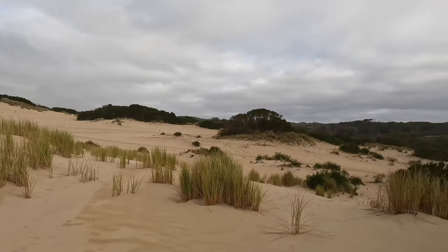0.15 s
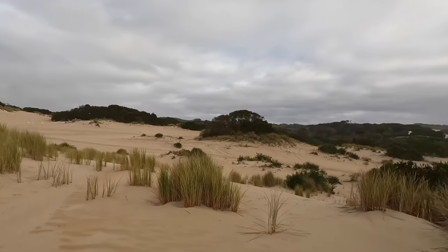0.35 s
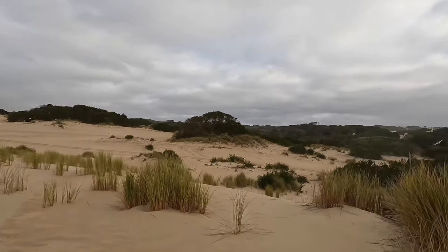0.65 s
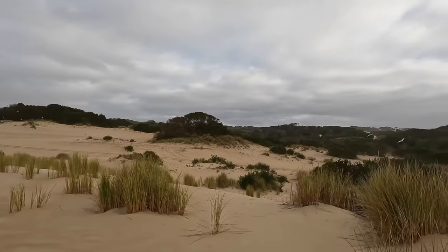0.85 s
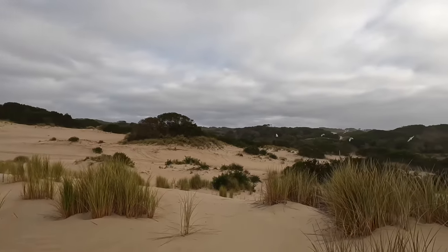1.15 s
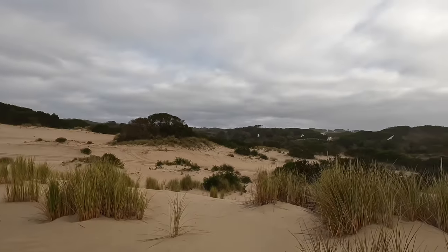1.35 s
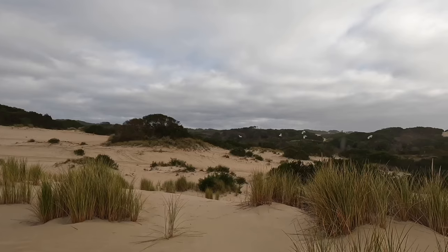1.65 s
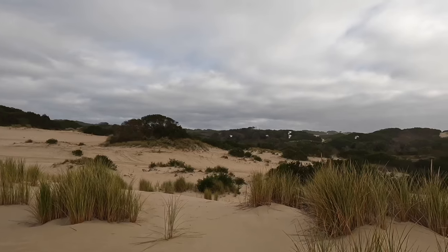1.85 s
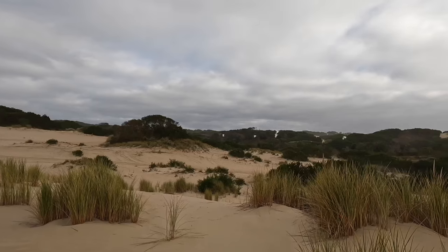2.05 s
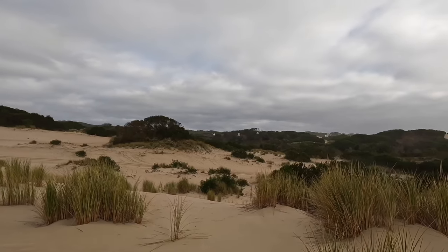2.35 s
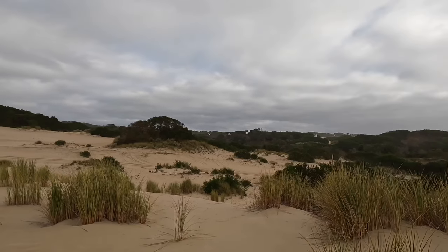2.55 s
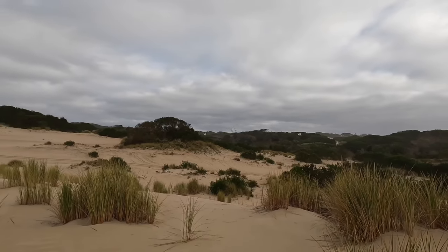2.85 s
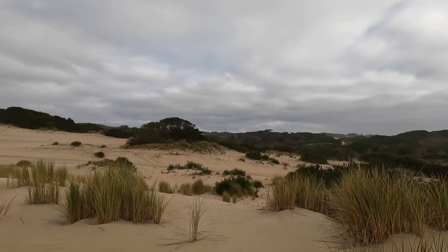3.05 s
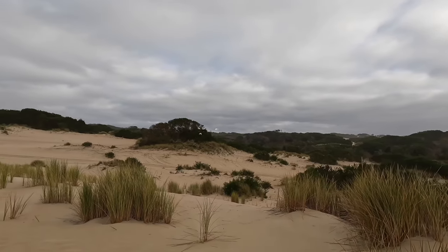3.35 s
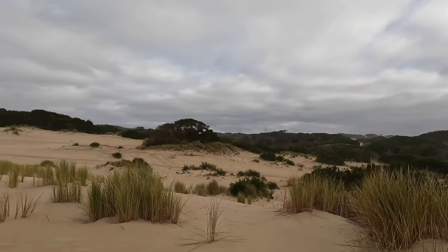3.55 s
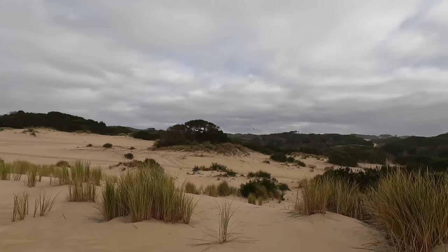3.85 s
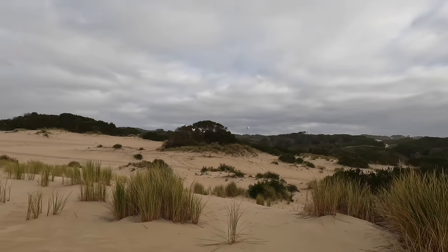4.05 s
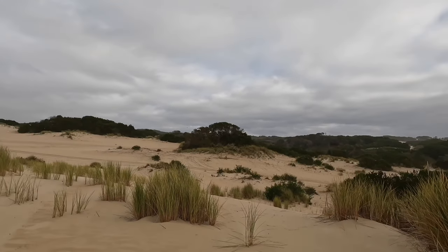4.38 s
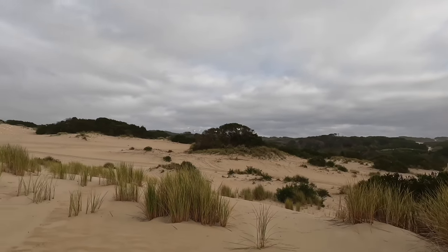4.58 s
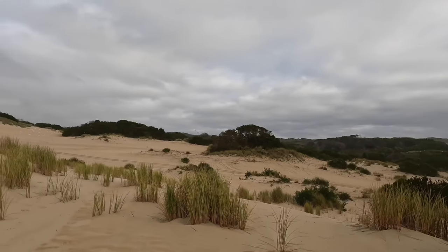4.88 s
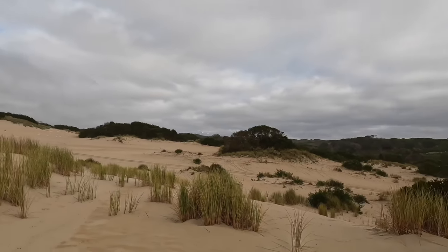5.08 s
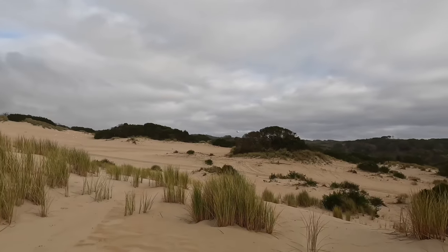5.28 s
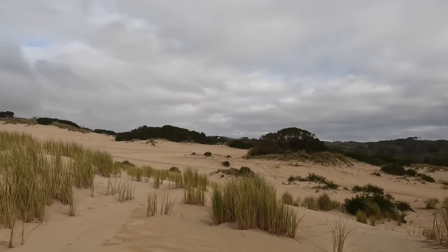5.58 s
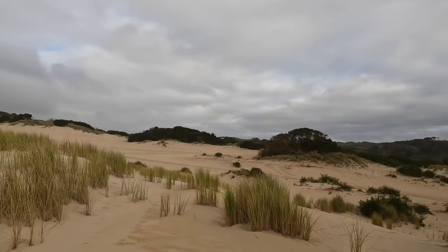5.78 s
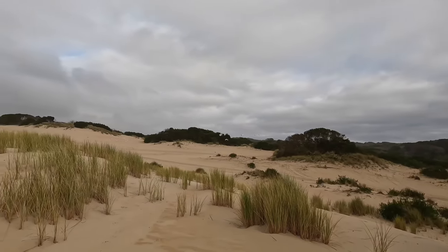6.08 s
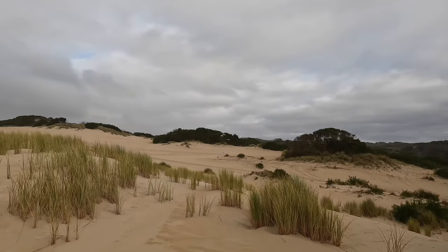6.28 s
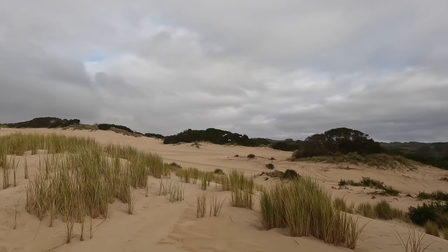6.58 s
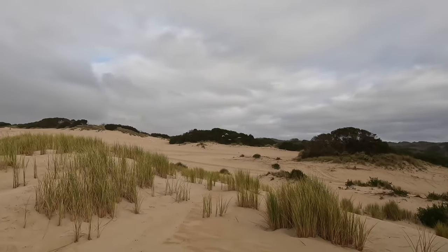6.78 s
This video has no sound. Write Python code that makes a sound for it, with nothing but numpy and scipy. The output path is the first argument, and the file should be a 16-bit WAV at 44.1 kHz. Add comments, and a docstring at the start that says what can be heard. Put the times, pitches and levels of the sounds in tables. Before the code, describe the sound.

Close cockatoos give loud, rough screeches while distant ones answer outdoors, with soft wind gusts and a low surf roar underneath.

```python
"""Cockatoos screech over coastal dunes: three close to the microphone, others far off in the scrub.
Each screech is a chaotic train of syrinx pulses near 950 Hz ringing the throat; at its end the voice
breaks and sinks about an octave. The calls arrive direct, off the sand and as a faint dune echo.
Wind rumbles on the microphone's two ports, grass rustles and distant surf lies underneath."""
import sys
import numpy as np
from scipy import signal
from scipy.fft import rfft, irfft, next_fast_len
from scipy.io import wavfile
from scipy.ndimage import uniform_filter1d

SR = 44100
rng = np.random.default_rng(int(sys.argv[2]) if len(sys.argv) > 2 else 0)


def file_out(sig):
    """Save sig as 16-bit WAV at sys.argv[1]."""
    # one column per channel
    cols = np.atleast_2d(sig).T
    # limit, then scale
    lim = np.clip(cols, -1, 1)
    pcm = np.round(lim * 32767).astype(np.int16)
    wavfile.write(sys.argv[1], SR, pcm)


N = 305552
TIME = np.arange(N) / SR

# One screech a row: caller, start_s, break_s, end_s, swell_s, level_db, crescendo_db, push_s, push_db,
# treble_share_db, pitch_hz, glide_hz_per_s, roughness (0-1), clearing (0-1, before the break),
# left_minus_right_db, first_lag_s, last_lag_s, bounce_strength (0-1; the last three: bounce off the sand)
# The "far" row at 3.3 s is only a very faint screech-like trace on the left.
SCREECHES = [ ("shrill", -.45, -0.031, 0.027, .06, -33, -4.5, -.2, 5, -7.5, 1000, 0, .6, .4, 1, 0.00256, .003, 1),
             ("far", .3, .868, .912, 0.053, -45.5, -1.6, 0.49, 2.8, -6.5, 890, 190, .8, 0.36, 5, .00243, 0.002074, 0.58),
             ("far", 1.0, 1.3, 1.33, .04, -71, -2, 1.08, 4.1, -14, 1200, -31, 0.98, 0.093, 17, 0.00082, 0.00101, .8),
             ("shrill", 1.319, 1.752, 1.79, 0.04, -29.4, -1.2, 1.442, 3, -3.5, 1035, 130, .8, 0.091, 0.83, .0064, .0062, 0.27),
             ("far", 1.76, 2.1, 2.14, 0.042, -52, 4, 1.99, 0.89, -8, 888, 102, 1, 0.308, 5.9, 0.0009, 0.00052, .05),
             ("shrill", 2.065, 2.529, 2.57, 0.042, -30.5, 1.7, 2.3, 2.25, -4.5, 990, -41, .76, 0.736, 1, 0.00232, 0.00223, 0.086),
             ("far", 2.76, 3.29, 3.34, 0.048, -52.5, 2.2, 2.97, 0.67, -8.5, 870, 75, .85, .3, 6.5, 0.004, .00246, .07),
             ("far", 3.3, 3.45, 3.56, .03, -67.5, -1, 3.4, 1.7, -6, 903, 150, .85, .2, 19.7, 0.0008, .00088, 0.55),
             ("far", 3.59, 4.112, 4.16, 0.067, -52, 3, 3.85, 1.2, -10.5, 893, 110, .87, .3, 4.5, 0.00224, 0.00217, 0.2),
             ("far", 4.27, 4.455, 4.49, 0.033, -64, 0.81, 4.38, 2, -22, 850, 150, 1, .1, 5.3, 0.0011, .00096, .1),
             ("hoarse", 4.562, 5.114, 5.17, 0.0546, -34.5, 1.5, 4.78, 2.9, -4, 990, -40, .7, .3, -.6, .0044, 0.0054, 0.22),
             ("gruff", 4.89, 5.364, 5.428, 0.044, -32.5, -1.1, 5.04, 2.8, -3.5, 900, 27.7, .76, 0.18, -.8, 0.00228, 0.00235, 0.1),
             ("hoarse", 5.42, 5.941, 5.976, 0.044, -34.6, 0, 5.55, 2.3, -3, 918, -100, 0.624, .75, -1.1, 0.0048, .0046, 0.22),
             ("hoarse", 6.296, 6.716, 6.772, 0.035, -34.5, -.5, 6.61, 1, -4, 935, -29.5, .6, .55, -1.2, 0.003, 0.00197, 0.11)]
# Throat and open beak as heard through the air at the microphone: frequency_hz, gain_db
SHRILL_THROAT = [(300, -27), (620, -23), (800, -15), (1080, -8), (1500, -11.5), (2150, 3.5), (2420, -2.5),
                 (3000, -3.5), (3950, -4.5), (4500, -8), (5500, -14), (7800, -23.5), (9300, -35),
                 (13500, -47)]
HOARSE_THROAT = [(300, -24.5), (620, -20), (880, -8.5), (1150, -6), (1500, -5.5), (2130, 5.5), (2450, -6),
                 (2850, 1.5), (3850, -1), (4450, -7.5), (5500, -12), (7600, -26), (9000, -43.5),
                 (13500, -47)]
GRUFF_THROAT = [(300, -55), (560, -4.5), (880, -7.5), (1150, -3.5), (1500, -2), (1950, 5), (2450, 2.5),
                (2850, 3.5), (3800, 4.5), (4450, -6.5), (5500, -7), (7600, -20.5), (9000, -40),
                (13500, -42.5)]
FAR_THROAT = [(300, -33.5), (700, -15), (900, -14), (1120, -9), (1500, -4), (1900, 0), (2350, 0.5),
              (3100, -6), (3600, -3), (4200, -12.5), (5200, -14.5), (6300, -28.5), (9000, -45),
              (13500, -69)]
# Upper resonances of the screech that swell and sink at random: centre_hz, width_hz
WAVERING_MODES = [(2800, 300), (3250, 350), (3750, 400), (4800, 500), (5600, 600)]
# Phase between the ports for birds ahead, to the right and far off: frequency_hz, left_lead_rad
AHEAD_PHASE = [(500, 0.21), (1000, -0.064), (1640, -0.55), (2240, -0.97), (2760, -0.86), (3050, 0.38),
               (4200, -0.36), (6400, -0.67), (8500, -0.64)]
RIGHT_PHASE = [(500, -0.47), (1000, -0.28), (1900, -0.92), (2330, -1.4), (2760, 0.054), (4300, -1.1),
               (6200, -0.89), (8200, -1.3)]
FAR_PHASE = [(690, .1), (1290, .2), (2580, -.2), (6200, 0)]
# Gusts at the microphone: peak_s, length_s, buffet_db, thud_db, rush_db
GUSTS = [(0.124, 0.12, -46.5, -55, -82), (0.532, 0.28, -41, -56, -61.5), (0.758, 0.16, -37, -52.5, -58.5),
         (1.156, 0.4, -47.5, -56.5, -60), (2.898, 0.12, -52, -72, -80), (3.267, .32, -54, -66, -56.5),
         (3.54, 0.19, -45, -61, -62), (4.015, 0.42, -44.5, -58, -64.5), (4.5, 0.38, -52, -65, -75.5),
         (4.985, 0.22, -60, -72, -61.5), (5.588, 0.15, -47.5, -52.5, -66.5), (5.883, 0.088, -50, -51, -61),
         (6.22, 0.44, -45.5, -50, -67), (6.466, 0.23, -56, -52, -56.5), (6.79, 0.36, -59, -61.5, -59)]
# The breeze between gusts: buffet_db, thud_db, rush_db
BREEZE = (-52.5, -67, -73)
# Brushes and flicks of grass: peak_s, length_s, level_db
GRASS_BRUSHES = [(0.75, 0.14, -56), (1.183, 0.34, -66), (1.29, 0.0053, -58), (2.645, 0.21, -64),
                 (3.205, .2, -68), (3.423, 0.25, -66.5)]
# Spectra of buffeted ports, thudding eddies, air rushing over sand, grass and surf: frequency_hz, gain_db
BUFFET_COLOUR = [(12, 4), (20, 13), (42, 8.5), (65, -3), (110, -19), (250, -55), (700, -100)]
THUD_COLOUR = [(40, -20), (70, 0), (110, -4.5), (170, -11.5), (300, -27), (800, -100)]
RUSH_COLOUR = [(120, -18), (250, 2), (400, -6), (520, -5.5), (750, -14), (1500, -14), (4000, -52),
               (10000, -70)]
GRASS_COLOUR = [(300, -28), (800, -9), (1500, 3), (4000, -22), (6000, -13), (8500, -22), (13000, -31)]
SURF_COLOUR = [(60, -1), (110, -7), (160, 2), (230, -9.5), (350, -26), (750, -40.5), (2000, -23.5),
               (5000, -33), (8500, -53), (13500, -54.5)]

# a screech starts weak, dull and rough, and settles over its swell time
ONSET_DB, ONSET_DULL_DB, ONSET_ROUGH = 15.5, 7, 0.371
# the held voice wavers
WAVER_PER_S, WAVER_HZ, WAVER_DB = 24, 25.98, 0.54
# once in each screech the bird pushes harder; effort brightens the voice
PUSH_WIDTH_S, TREBLE_DB_PER_EFFORT_DB = 0.07, 0.49
# just before the break the voice strains: it lifts and clears
STRAIN_S, STRAIN_HZ, STRAIN_DB = 0.0547, 35.1, 0.98
# the broken voice drops, sinks further and dies as the beak closes
BREAK_FADE_S, BROKEN_HZ, BROKEN_SAG_HZ, BROKEN_ROUGH = 0.0065, 615.3, 125, .25
CLOSING_DB, CLOSING_DULL_DB = 25, 2.5
SIDE_SIGN = np.array([[1], [-1]])  # left, right


def cockatoo(name, throat, left_lead):
    """Screeches from one direction, which reach the microphone's two ports out of phase."""
    sound = sum(screech(call, throat) for caller, *call in SCREECHES if caller == name)
    size = 2 * next_fast_len(N // 2 + 2048, real=True)
    port_shift = np.exp(.5j * on_bins(left_lead, size) * SIDE_SIGN)
    return irfft(rfft(sound, size) * port_shift, size)[:, :N]


def screech(call, throat, hiss_db=-9, treble_hz=2600, rise_s=0.02, fall_s=0.0087):
    """Pulses and a puff of air after each ring the throat; effort sets level and brightness."""
    *gesture, pan_db, first_lag_s, last_lag_s, bounce_strength = call
    start_s, _, end_s = gesture[:3]
    start, end = max(int(start_s * SR), 0), int(end_s * SR)
    t = TIME[start:end]
    hz, rough, level_db, treble_share_db = voice(t, *gesture)
    pulses = unit(syrinx(hz, rough))
    puff_envelope = signal.lfilter([1], [1, -np.exp(-1 / 20)], pulses)
    puffs = unit(puff_envelope * rng.standard_normal(len(t)))
    sound = vocal_tract(pulses + undb(hiss_db) * rough * puffs, throat, hz)
    sound = sand_bounce(sound, first_lag_s, last_lag_s, bounce_strength)
    low = signal.sosfiltfilt(signal.butter(4, treble_hz, fs=SR, output="sos"), sound)
    treble_share = np.clip(undb(treble_share_db) ** 2, .01, .9)
    sound = np.sqrt(1 - treble_share) * unit(low) + np.sqrt(treble_share) * unit(sound - low)
    # the air supply keeps the power steady however the membranes flap
    sound /= np.sqrt(uniform_filter1d(sound ** 2, size=900) + 1e-12)
    gate = np.clip((t - start_s) / rise_s, 0, 1) * np.clip((end_s - t) / fall_s, 0, 1)
    out = np.zeros((2, N))
    out[:, start:end] = sound * gate * undb(level_db) * undb(pan_db * SIDE_SIGN / 2)
    return out


def voice(t, start_s, break_s, end_s, swell_s, level_db, crescendo_db, push_s, push_db, treble_share_db,
          pitch_hz, glide_hz_per_s, roughness, clearing):
    """Swell, push, strain, break and close: pitch, roughness, level and treble share of one screech."""
    slack = np.exp(-(np.maximum(t - start_s, 0) / swell_s) ** 1.3)
    strain = np.exp(-(np.minimum(t - break_s, 0) / STRAIN_S) ** 2)
    broken = np.clip((t - break_s) / BREAK_FADE_S + .5, 0, 1)
    closing = np.clip((t - break_s) / (end_s - break_s), 0, 1)
    from_middle_s = np.minimum(t, break_s) - (start_s + break_s) / 2
    held_hz = pitch_hz + glide_hz_per_s * from_middle_s + STRAIN_HZ * strain ** 2
    held_hz += WAVER_HZ * wander(WAVER_PER_S, len(t))
    held_rough = (roughness + ONSET_ROUGH * slack) * (1 - clearing * strain)
    held_db = level_db + crescendo_db * from_middle_s / (break_s - start_s)
    held_db += WAVER_DB * wander(WAVER_PER_S, len(t))
    hz = (1 - broken) * held_hz + broken * (BROKEN_HZ - BROKEN_SAG_HZ * closing)
    rough = (1 - broken) * held_rough + broken * BROKEN_ROUGH
    effort_db = push_db * np.exp(-((t - push_s) / PUSH_WIDTH_S) ** 2) + STRAIN_DB * strain
    db = held_db + effort_db - ONSET_DB * slack - CLOSING_DB * closing ** 3
    dull_db = ONSET_DULL_DB * np.sqrt(slack) + CLOSING_DULL_DB * closing
    return hz, rough, db, treble_share_db + TREBLE_DB_PER_EFFORT_DB * effort_db - dull_db


def syrinx(hz, rough, wobble=.095, jitter=0.073, scatter_db=3.5, limp=0.49, rasp_db=1.5):
    """One pulse per slap of the membranes; roughness shakes rate, timing and strength."""
    count = len(hz)
    # chaos comes in fits, with nearly regular moments between
    rough = np.clip(rough * np.exp(.22 * wander(60, count)), 0, 1.2)
    rate_shake = .036 * wander(110, count) + wobble * wander(700, count)
    cycles = np.cumsum(hz * np.exp(rough * rate_shake)) / SR
    slap_at = np.interp(np.arange(1, int(cycles[-1])), cycles, np.arange(count))
    i = slap_at.astype(int)
    late, strength, slip = rng.standard_normal((len(slap_at), 3)).T
    # a pattern of four slaps holds for a moment, then melts into another
    late, strength = recur(late, memory=.75), recur(strength, memory=.7)
    # strong and weak slaps take turns, and keep slipping out of step
    turns = np.cumprod(np.where(slip > .9, 1, -1))
    force = undb(scatter_db * rough[i] * 2 * np.tanh(strength / 2)) * (1 + limp * rough[i] * turns)
    late_cycles = (0.023 + jitter * rough[i]) * late
    slap_at = np.clip(slap_at + late_cycles * SR / hz[i], 0, count - 2)
    i, fraction = slap_at.astype(int), slap_at % 1
    pulses = np.bincount(i, force * (1 - fraction), count) + np.bincount(i + 1, force * fraction, count)
    return pulses * undb(rasp_db * rough * wander(260, count))


def vocal_tract(source, throat, pitch_hz, beak_hz=1300, beak_db=7):
    """Throat, windpipe and beak colour the pulses in turn, and the treble wavers."""
    sound = waver_treble(resonate(source, throat))
    # the windpipe holds back sound near its modes, so each slap rings on
    for mode_hz, width_hz in [(2100, 1100), (3900, 880)]:
        sound = sound - 2 * ring(sound, mode_hz, width_hz)
    # as the voice breaks downward the closing beak adds a hollow resonance
    closing = np.clip((800 - pitch_hz) / 200, 0, 1)
    return sound + closing * undb(beak_db) * ring(sound, beak_hz, width_hz=750)


def waver_treble(sound, depth=.27, waver_per_s=35.15):
    """Each upper resonance of the screech swells and sinks at random."""
    return sound + sum(depth * wander(waver_per_s, len(sound)) * ring(sound, hz, width_hz)
                       for hz, width_hz in WAVERING_MODES)


def sand_bounce(sound, first_lag_s, last_lag_s, strength):
    """A second path to the microphone, off the sand, whose lag slides as the bird flies."""
    n = np.arange(len(sound))
    lag_samples = SR * np.linspace(first_lag_s, last_lag_s, len(n))
    return sound + strength * np.interp(n - lag_samples, n, sound, left=0)


def dune_echo(sound, t60_s, build_s, dull_hz, side_db):
    """Diffuse scatter from sand and scrub, dull in the treble, that builds up and fades."""
    t = TIME[:2 * SR]
    envelope = (1 - np.exp(-t / build_s)) * np.exp(-np.log(1000) * t / t60_s)
    mid, side = rng.standard_normal((2, len(t))) * envelope
    echo = mid + undb(side_db) * side * SIDE_SIGN
    echo /= np.sqrt(np.sum(echo ** 2) / 2)
    dull = signal.sosfilt(signal.butter(2, dull_hz, fs=SR, output="sos"), sound.mean(axis=0))
    return signal.fftconvolve(dull[None], echo, axes=1)[:, :N]


def wind(flutter_db=2.5, flutter_per_s=12):
    """Gusts swell out of a breeze, buffet the microphone, thud in eddies and rush over the sand."""
    power = undb(BREEZE)[:, None] ** 2
    for peak_s, length_s, *gust_db in GUSTS:
        power = power + undb(gust_db)[:, None] ** 2 * swell(peak_s, length_s)
    push, eddy, flow = np.sqrt(power) * undb(flutter_db * wander(flutter_per_s, N))
    buffet = stereo_noise(BUFFET_COLOUR, side_db=-10) * push
    thud = stereo_noise(THUD_COLOUR, side_db=-12) * eddy
    rush = stereo_noise(RUSH_COLOUR, side_db=-5) * flow
    # the right port faces the wind
    return (buffet + thud) * undb([[-1.3], [1.1]]) + rush


def grass(flicker_db=3):
    """Dry blades brush each other in short soft swells."""
    brushing = sum(undb(db) * swell(peak_s, length_s) for peak_s, length_s, db in GRASS_BRUSHES)
    return stereo_noise(GRASS_COLOUR, side_db=5) * brushing * undb(flicker_db * wander(150, N))


def surf(level_db=-57.0, waver_db=1.5):
    """Distant surf reaches the dunes as a low, slightly wavering roar."""
    return stereo_noise(SURF_COLOUR, side_db=-16.5) * undb(level_db + waver_db * wander(13, N))


def undb(db):
    """Decibels to gain."""
    return 10 ** (np.asarray(db) / 20)


def unit(x):
    """Scale to rms 1."""
    return x / np.sqrt(np.mean(x ** 2) + 1e-20)


def swell(peak_s, length_s):
    """A bell curve in time with height 1."""
    return np.exp(-(2 * (TIME - peak_s) / length_s) ** 2)


def wander(per_s, count):
    """A random curve with rms 1 that turns about per_s times a second."""
    steps = np.arange(count) * per_s / SR
    return unit(np.interp(steps, np.arange(count // 8), rng.standard_normal(count // 8)))


def recur(chance, memory, period=4):
    """Each value partly repeats the one a period back."""
    return signal.lfilter([np.sqrt(1 - memory ** 2)], np.r_[1, np.zeros(period - 1), -memory], chance)


def on_bins(points, size):
    """(frequency_hz, value) points laid on the bins of a transform."""
    hz, value = np.transpose(points)
    bin_hz = np.arange(size // 2 + 1) * SR / size
    return np.interp(np.log(bin_hz + 1), np.log(hz), value)


def resonate(x, colour, size=1024):
    """Ring a minimum-phase filter of the given (frequency_hz, gain_db) shape."""
    cepstrum = irfft(np.log(undb(on_bins(colour, size))))
    cepstrum[1:size // 2] *= 2
    cepstrum[size // 2 + 1:] = 0
    impulse_response = irfft(np.exp(rfft(cepstrum)))
    return signal.fftconvolve(x, impulse_response)[:len(x)]


def ring(x, hz, width_hz):
    """One resonance with gain 1 at its centre."""
    return signal.lfilter(*signal.iirpeak(hz, hz / width_hz, fs=SR), x)


def stereo_noise(colour, side_db):
    """Noise with rms 1 of a given colour and stereo width."""
    size = next_fast_len(N, real=True)
    spectrum = rfft(rng.standard_normal((2, size))) * undb(on_bins(colour, size))
    mid, side = irfft(spectrum, size)[:, :N]
    return unit(mid + undb(side_db) * side * SIDE_SIGN)


def scene():
    """One close bird ahead, two to the right and others far off, over echoes, wind, surf and grass."""
    near = (cockatoo("shrill", SHRILL_THROAT, AHEAD_PHASE)
            + cockatoo("hoarse", HOARSE_THROAT, RIGHT_PHASE)
            + cockatoo("gruff", GRUFF_THROAT, RIGHT_PHASE))
    far = cockatoo("far", FAR_THROAT, FAR_PHASE)  # with the faint trace on the left
    to_ground = undb(-10.5) * near + undb(-8.0) * far
    to_slopes = undb(-18.5) * near + undb(-15) * far
    ground = dune_echo(to_ground, t60_s=0.12, build_s=0.00084, dull_hz=11000, side_db=-3.5)
    slopes = dune_echo(to_slopes, t60_s=1.5, build_s=0.018, dull_hz=7500, side_db=-4.5)
    # soft sand soaks up the low end of what grazes along it
    slopes = signal.sosfilt(signal.butter(2, 1300, "high", fs=SR, output="sos"), slopes)
    return near + far + ground + slopes + wind() + surf() + grass()


def record(dry):
    """The camera behind the microphone cuts the treble above 13.8 kHz."""
    return signal.sosfilt(signal.ellip(8, .2, 70, 13800, fs=SR, output="sos"), dry)


dry = scene()
out = record(dry)
file_out(out)
```